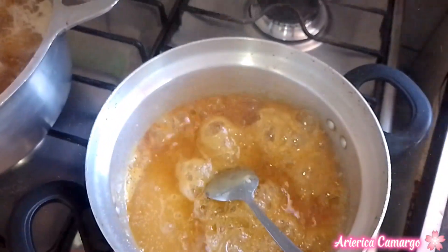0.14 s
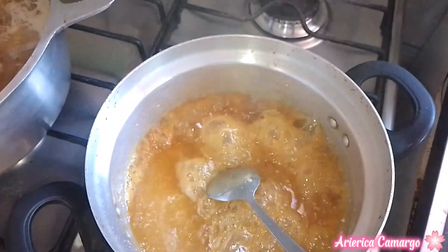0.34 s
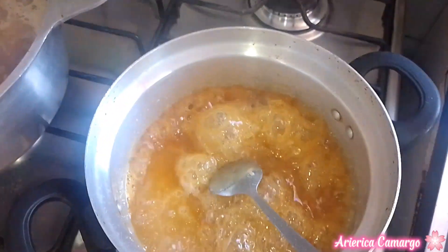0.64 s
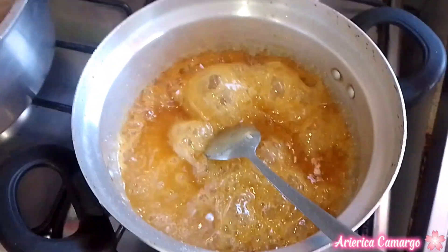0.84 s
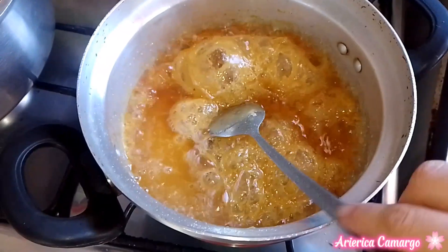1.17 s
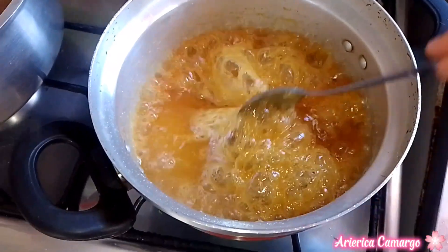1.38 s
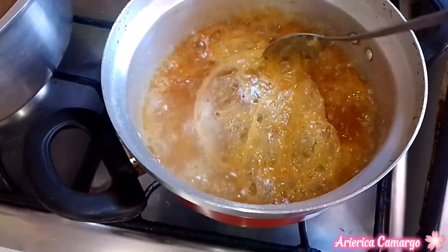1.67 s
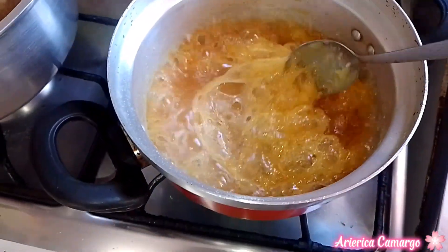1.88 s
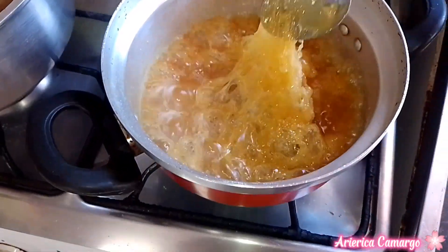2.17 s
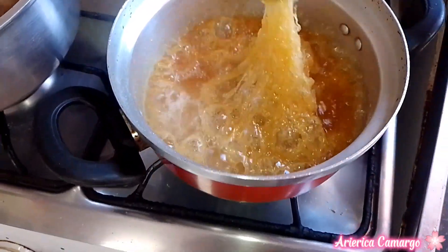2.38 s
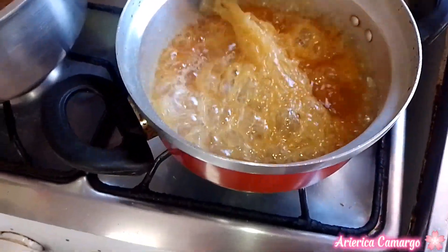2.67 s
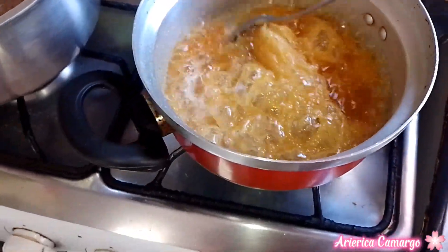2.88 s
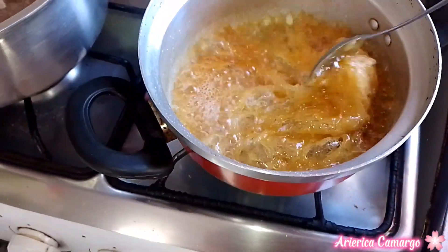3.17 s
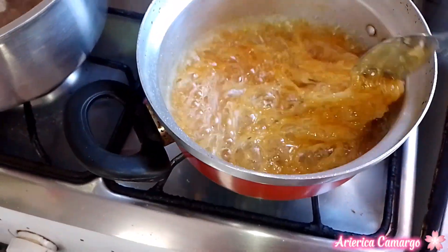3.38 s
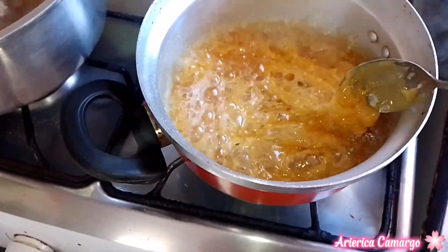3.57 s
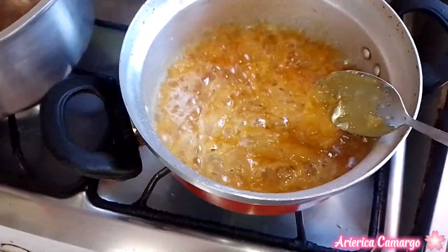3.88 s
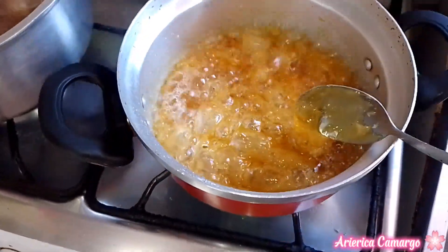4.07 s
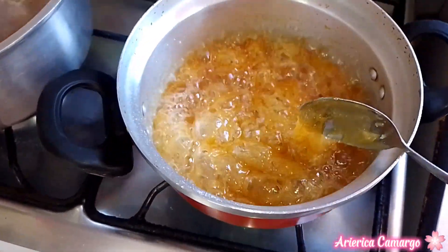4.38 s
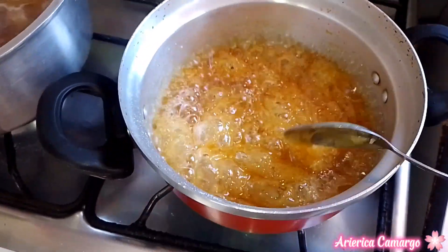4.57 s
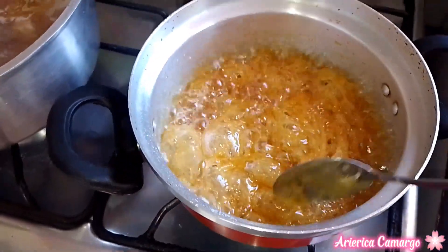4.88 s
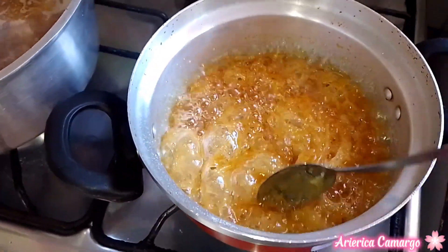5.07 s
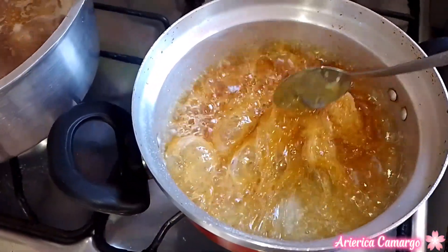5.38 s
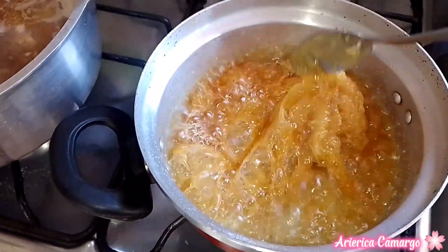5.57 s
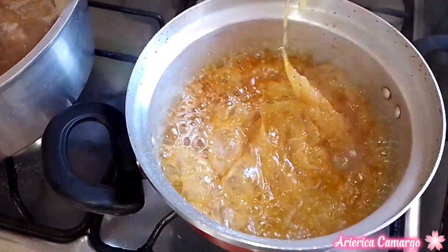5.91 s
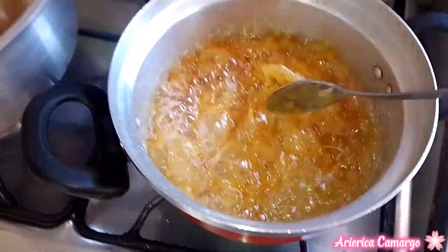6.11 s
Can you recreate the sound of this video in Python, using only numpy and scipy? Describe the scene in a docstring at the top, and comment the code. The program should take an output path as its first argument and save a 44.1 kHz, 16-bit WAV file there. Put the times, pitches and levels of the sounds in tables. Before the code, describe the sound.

Hot sugar syrup sizzles violently with steam after a brief dull scuff, then calms to gentle, thick bubbling, sputters and brittle little ticks.

```python
"""Wet caramel boils hard in an aluminium pan while a spoon folds it: flurries of random clicks, filtered
into crackle, sputter, fizz and steam, make a fierce hiss that sinks to a thin fizz with single spurts.
Brittle snaps tick on top, and decaying tones that rise in pitch make thick bubbles plop underneath.
A dull scuff of ringing tones and filtered noise comes at the start, over a faint low kitchen hum."""
import sys
import numpy as np
from scipy import signal
from scipy.fft import rfft, irfft, next_fast_len
from scipy.io import wavfile
from scipy.ndimage import uniform_filter1d

SR = 44100
rng = np.random.default_rng(int(sys.argv[2]) if len(sys.argv) > 2 else 0)


def unload_audio(sound):
    """Save the sound as a 16-bit wav file, at the path given as the first command line argument."""
    columns = np.transpose(np.atleast_2d(sound))
    # keep every value between -1 and 1, then stretch to whole-number steps
    steps = np.round(np.clip(columns, -1, 1) * 32767)
    wavfile.write(sys.argv[1], SR, steps.astype(np.int16))


N = 275388
TIME = np.arange(N) / SR
PADDED = next_fast_len(N, real=True)

# Colour of each layer before levelling: (frequency [Hz], relative density [dB per Hz])
CRACKLE_COLOUR = [(200, -67), (1900, -32), (2400, -14.5), (2750, -1), (4000, 1.5), (5200, 2.5), (6800, 1),
                  (8000, -0.5), (10500, -2.5), (12500, -20)]
SPUTTER_COLOUR = [(200, -47), (900, -5.5), (1250, -1.5), (1500, 3.5), (1750, 0), (2000, 1), (2300, 2),
                  (2800, 1), (3600, -14)]
FIZZ_COLOUR = [(200, -57), (2400, -27), (6000, -9), (7500, -3.5), (8300, 0.5), (9000, 2.5), (9700, 2),
               (10500, -1.5), (12000, -9.5)]
STEAM_COLOUR = [(200, -65), (8500, -43), (10500, 3.5), (11500, 3.5), (13000, 4.5), (14500, 1.5),
                (15700, -1.5)]
SYRUP_COLOUR = [(60, -43), (160, -24), (240, -10.5), (300, -5.5), (420, 1.5), (580, -1.5), (660, -1.5),
                (820, 1), (1050, 0), (1250, -11.5), (1600, -18), (2500, -40)]
HUM_COLOUR = [(20, 0), (55, -.5), (90, -4), (118, 4.5), (150, -2), (300, -19), (1000, -41)]
# Air modes and a hollow of the pan: (frequency [Hz], width [Hz], lift [dB])
PAN_MODES = [(302.8, 13, 8.5), (410, 43, 2), (563, 47, 3.5), (668, 21, -9.5), (820.5, 22, 5.5),
             (910, 21, 5), (1010, 18, 3), (1780, 17, 6.5)]
# How hard the surface fries: (time [s], base level of the fizz [dB])
FRYING = [(0, -24), (.35, -24.5), (.44, -28), (.78, -22), (1.03, -20.5), (1.39, -23.5), (1.48, -19),
          (1.96, -20), (2.72, -23), (2.88, -20.5), (3.65, -29.5), (4.05, -29.5), (4.16, -31), (4.33, -32),
          (4.5, -32.5), (4.62, -33), (4.75, -37), (5.1, -31), (5.7, -32), (6.06, -39), (6.24, -41.5)]
# Coarser bursts, which die away as the water is spent:
# (time [s], base crackle level [dB], base sputter level [dB])
CRACKLING = [(0, -28, -38), (.11, -30, -33), (.3, -29, -35), (1.0, -28, -39.5), (1.65, -28, -38.5),
             (2.0, -28.5, -39), (2.68, -30, -40.5), (2.8, -27, -35.5), (3.3, -29.5, -38.5),
             (3.75, -32, -42), (4.1, -35, -51), (4.75, -47, -52.5), (5.1, -45, -52.5), (5.58, -40, -47.5),
             (5.95, -48, -53), (6.24, -48.5, -52.5)]
# High hiss of the steam jets, which give out rather suddenly: (time [s], level against the fizz [dB])
JETS = [(0, -6.5), (.45, -2), (1.0, -7), (1.7, -3.5), (2.15, -5), (2.9, -5.5), (3.42, -7), (3.56, -7),
        (3.68, -13), (3.85, -15), (4.35, -16.5), (5.4, -17), (6.24, -17)]
# Middle of the fizz, which ends lower as its bubbles grow: (time [s], centre [Hz])
FIZZ_CENTRE = [(0, 9200), (4.3, 9400), (4.8, 9370), (5.5, 9050), (6.1, 9150)]
# Narrow bands lifted out of the crackle and boil, mostly late:
# (time [s], half length [s], frequency [Hz], glide [Hz per s], width [Hz], lift [dB])
LIFTED_BANDS = [(.03, .05, 2960, -4000, 256, 8), (.18, 0.039, 3070, 7000, 260, 9),
                (1.02, 0.22, 6600, 0, 200, 5.5), (2.79, 0.071, 3340, -1500, 260, 4),
                (3.9, 0.4, 2150, 0, 110, 8.5), (4.38, 0.088, 2890, 0, 130, 14.5),
                (4.38, .2, 5940, -500, 170, 7), (4.38, 0.074, 5280, 0, 130, 12), (4.4, .2, 4190, 0, 110, 6),
                (4.47, 0.22, 3830, 0, 110, 7), (4.56, .15, 5050, -200, 160, 10.5),
                (4.9, 0.18, 3120, -1200, 150, 9), (5.2, 0.18, 2920, -100, 150, 11),
                (5.22, .17, 5240, 350, 160, 9), (5.17, 0.23, 1480, -48, 100, 12.5),
                (5.6, 0.27, 1480, 150, 110, 10), (5.4, 0.24, 6710, 150, 230, 14.5),
                (5.55, 0.12, 5120, -900, 140, 10), (5.62, 0.23, 3260, 1100, 190, 12.5),
                (5.64, 0.17, 4580, -300, 170, 11), (5.75, .11, 6370, 0, 170, 16.5),
                (5.89, 0.054, 4620, 0, 130, 11), (5.92, 0.1, 2250, 0, 100, 9),
                (5.92, 0.077, 2700, 0, 100, 9), (6.093, 0.091, 3290, 0, 110, 12.5)]
# Narrow bands thinned out of the crackle and boil for a while:
# (time [s], half length [s], frequency [Hz], glide [Hz per s], width [Hz], depth [dB])
THINNED_BANDS = [(.2, 0.5, 4370, 0, 260, 5), (.42, 0.35, 1374, -90, 116, 28), (.45, 0.23, 596, 0, 70, 16),
                 (1.15, 0.39, 1340, -100, 110, 13), (1.3, 0.18, 2050, 0, 131, 33),
                 (1.25, 0.14, 2890, 0, 100, 22), (1.29, 0.14, 6300, -500, 220, 4),
                 (1.6, 0.24, 1960, 0, 85, 24), (2.1, .08, 1930, 0, 130, 12),
                 (2.54, 0.18, 2430, 150, 85, 30), (2.57, .1, 2040, 0, 80, 11), (2.55, .13, 332, 0, 70, 14),
                 (2.65, .17, 1180, -200, 110, 18), (3.55, 0.48, 1560, -300, 160, 5.5),
                 (3.77, 0.25, 2370, -200, 90, 22), (4.1, .14, 1850, 0, 300, 4.5),
                 (4.1, 0.3, 6800, 0, 170, 6), (4.42, .12, 2530, 0, 119, 8), (4.8, 0.3, 555, 0, 110, 11),
                 (6.1, 0.22, 566, 0, 70, 3)]
# Single spurts of steam: (time [s], level [dB], length [s], rise [s])
SPURTS = [(1.238, -22, 0.028, .008), (3.54, -22.5, 0.023, 0.0086), (3.61, -31, 0.013, .003),
          (3.716, -29, .016, .003), (3.887, -26, .024, .008), (3.93, -27, .012, .002),
          (4.07, -30, .033, .005), (4.194, -33, .022, .008), (4.322, -32, 0.011, .004),
          (4.366, -30, .014, .003), (4.533, -32, 0.016, 0.0092), (4.61, -34, 0.016, .008),
          (4.821, -27.5, .02, .009), (4.88, -33, .018, .004), (4.94, -32, .018, .006),
          (4.983, -27, .018, .0003), (5.044, -27, .0077, .002), (5.353, -28, .018, .008),
          (5.413, -27, .017, .009), (5.511, -28, 0.019, .008), (5.606, -24.5, 0.01, .006),
          (5.667, -29, .016, .006), (5.723, -29.5, 0.019, .008), (5.801, -30.5, 0.021, .008)]
# Sharp snaps of bursting sugar skin: (time [s], peak of the envelope [dB])
SNAPS = [(1.323, -11), (3.565, -17), (4.925, -18), (4.9805, -16), (5.064, -22), (5.151, -21), (5.203, -15),
         (5.323, -24), (5.428, -19), (5.525, -20), (5.731, -22)]
# Large bubbles welling up, mostly as the spoon folds the syrup:
# (time [s], half length [s], gain [dB], deepening [dB])
SURGES = [(0.097, 0.065, 3.5, 13), (.35, 0.22, 1, 11), (0.893, 0.14, 2, 11), (1.573, 0.28, 2.5, 11.5),
          (2.095, 0.35, 2, -2), (2.77, 0.055, 3, -3), (3.174, 0.74, 3, 13), (3.73, 0.12, -0.5, 10),
          (4.324, 0.086, 1.5, 6), (5.092, 0.16, 1, 12.5), (5.53, 0.32, 3.5, 3)]
# Single large bubbles that burst: (time [s], level before swell and decay [dB], pitch [Hz])
PLOPS = [(.699, -27, 988), (1.489, -32, 525), (2.707, -30, 548), (2.716, -39, 394), (2.742, -28, 798),
         (3.273, -31, 804), (3.45, -28, 940), (3.464, -32, 1076), (3.622, -30, 923), (3.753, -34, 813),
         (4.212, -32, 833), (4.335, -29, 910), (5.061, -32, 970), (5.613, -28, 863), (5.649, -31, 810),
         (5.84, -38, 496)]
# The scuff, in two slips and a faint settling:
# (time [s], relative level [dB], rub length [s], grit against the knock [dB])
SLIPS = [(.049, -28.5, 0.03, 0), (0.07, -23.5, 0.021, 4.5), (0.119, -46, 0.023, -3)]
# What the scuff rings with, lowest first: (frequency [Hz], width [Hz], relative level [dB])
SCUFF_RINGS = [(376, 38, 0), (1798, 27, 1), (2600, 80, 0), (3000, 62, -6)]

SETTLE_AT_S, SETTLE_S = 3.44, 0.23  # the fierce hiss gives way to a gentle fizz
FIZZ_HALF_WIDTH_HZ, FIZZ_DOUBLING_DB = 2250, 12  # the half width holds for a fizz at -30 dB
BOIL_DB, BOIL_FADE_DB_PER_S = -40.5, 0.0656
EDGE_HZ = 15780


def sizzle():
    """Water flashes to steam in dense tiny bursts that come in flurries."""
    fizz_db = curve(FRYING, TIME)
    crackle_db = curve(CRACKLING, TIME)
    sputter_db = curve(CRACKLING, TIME, column=2)
    steam_db = fizz_db + curve(JETS, TIME)
    flurry = wander(rate_hz=25) + 0.38 * wander(rate_hz=17)
    calm = np.clip((-21.5 - fizz_db) / 12, 0, 1)  # fewer bursts: each flurry stands out more

    crackle = in_pan(pops(per_s=11000, spread_db=1.5), CRACKLE_COLOUR)
    crackle = crackle * gain_of(crackle_db + 0.37 * flurry + 0.98)
    sputter = in_pan(pops(per_s=4000, spread_db=1.0), SPUTTER_COLOUR)
    sputter = sputter * gain_of(sputter_db + 0.24 * flurry + 2.0)
    coarse = sweep(crackle + sputter + ticks(), crackle_colour)

    fizz = sweep(in_pan(pops(per_s=16000, spread_db=2.5), FIZZ_COLOUR), fizz_band)
    fizz = fizz * gain_of(fizz_db + (0.38 + 0.76 * calm) * flurry - 0.2)
    steam = sweep(in_pan(pops(per_s=16000, spread_db=2.4), STEAM_COLOUR), steam_tilt)
    steam = steam * gain_of(steam_db + flurry)
    return coarse + fizz + steam


def ticks(level_db=-12, cycles=4.8, count=12):
    """Separate tiny bubbles stand out of the crackle, each ringing for a moment at its own pitch."""
    t, out = np.arange(SR // 50) / SR, np.zeros(N)
    for hz in np.geomspace(2800, 7000, count):
        ring = evened(np.exp(-hz * t / cycles) * np.sin(2 * np.pi * hz * t))
        out += signal.oaconvolve(pops(per_s=24, spread_db=2.5), ring)[:N]
    out = filtered(out, 6, 2500, "high")
    return evened(out) * gain_of(curve(CRACKLING, TIME) + level_db)


def crackle_colour(hz, t, patchy_db=1.5):
    """The coarse bursts take on a shifting colour and come in small clusters, in dB."""
    return shifting_colour(hz, t) + patchy_db * clusters(hz, t, size=9)


def fizz_band(hz, t, edge_hz=120, skirt_db=-19, widest_hz=3300):
    """A gentle fizz has bubbles of nearly one size; a fierce one spreads wider, in dB."""
    half_width = FIZZ_HALF_WIDTH_HZ * 2 ** ((curve(FRYING, t) + 30) / FIZZ_DOUBLING_DB)
    half_width = np.minimum(half_width, widest_hz)
    within_hz = half_width - abs(hz - curve(FIZZ_CENTRE, t))
    inside = (1 + np.tanh(within_hz / edge_hz / 2 + .5)) / 2
    return skirt_db * (1 - inside) + 2.4 * clusters(hz, t)


def steam_tilt(hz, t, slope_db_per_khz=2.3, shelf_db=1.0, shelf_hz=11400, patchy_db=2.6):
    """As the jets weaken, the hiss loses its highest part first, in dB."""
    above_khz = np.maximum(hz - shelf_hz, 0) / 1000
    loss_db = shelf_db * np.tanh(2 * above_khz) + slope_db_per_khz * above_khz
    return patchy_db * clusters(hz, t) - settled(t) * loss_db


def spurts():
    """A pocket of steam tears open and fizzes for a moment."""
    strength, t = np.zeros(N), np.arange(SR // 10) / SR
    for s, db, length, rise in SPURTS:
        opening = np.minimum(t / rise, 1)
        add(strength, s, gain_of(db) * opening * bell(t ** 2, 0, length ** 2))
    bursts = pops(per_s=12000, spread_db=2.4)
    return strength * sweep(in_pan(bursts, FIZZ_COLOUR), fizz_band)


def snaps(ring_hz=9200, swell_s=0.00015):
    """A brittle film breaks with a very short, high tick."""
    out, t = np.zeros(N), np.arange(SR // 200) / SR
    envelope = t / swell_s * np.exp(1 - t / swell_s)
    for s, db in SNAPS:
        add(out, s, gain_of(db) * envelope * np.sin(2 * np.pi * ring_hz * t))
    return out


def boil(per_s=90, cycles=3.82, rise=0.12, count=30):
    """Bubbles in thick syrup: each rings for a few cycles and rises a little in pitch."""
    t, bubbles = np.arange(2500) / SR, np.zeros(N)
    for hz in np.geomspace(270, 1400, count):
        age = hz * t / cycles  # 1 when the ring has decayed by a factor e
        pitch = hz * (1 + rise * np.minimum(age, 2))
        ring = np.exp(-age) * np.sin(2 * np.pi * np.cumsum(pitch) / SR)
        bubbles += hz * signal.oaconvolve(pops(per_s, spread_db=1.5), ring)[:N]
    fine_clicks = gain_of(4.5) * pops(per_s=1200, spread_db=2.0)
    syrup = drift(in_pan(evened(bubbles) + fine_clicks, SYRUP_COLOUR))
    surge_db, _ = surge(TIME)
    level_db = BOIL_DB - BOIL_FADE_DB_PER_S * TIME + surge_db
    return sweep(syrup, bubble_size, size=2048) * gain_of(level_db)


def bubble_size(hz, t, corner_hz=340, rest_db=-11, colour_share=0.77):
    """When the bubbles grow large the boil reaches deeper, in dB."""
    _, deep_db = surge(t)
    low_end_db = (rest_db + deep_db) / (1 + (hz / corner_hz) ** 8)
    return low_end_db + colour_share * shifting_colour(hz, t)


def surge(t):
    """Extra level and extra depth of the boil as large bubbles well up, both in dB."""
    return sum(np.outer([db, deep_db], bell(t, s, length)) for s, length, db, deep_db in SURGES)


def drift(x, share=0.00805):
    """Steam and the heaving surface pull the pan's resonances slightly up and down: a wavering speed."""
    shift_s = share * np.cumsum(wander(rate_hz=2.97)) / SR
    return np.interp(TIME + shift_s, TIME, x, period=N / SR)


def plops(cycles=9, rise=0.052, swell_s=0.0032):
    """A large bubble opens and rings briefly, rising a little in pitch."""
    out, t = np.zeros(N), np.arange(SR // 8) / SR
    for s, db, hz in PLOPS:
        age = hz * t / cycles
        pitch = hz * (1 + rise * (np.minimum(age, 2) - .5))
        ring = np.sin(2 * np.pi * np.cumsum(pitch) / SR)
        add(out, s, gain_of(db) * np.minimum(t / swell_s, 1) * np.exp(-age) * ring)
    return filtered(out, 6, 260, "high")


def scuff():
    """Each slip knocks the lowest mode and rubs the upper ones, with a broad rasp."""
    out, t = np.zeros(N), np.arange(SR // 10) / SR
    rings = []
    for hz, width, db in SCUFF_RINGS:
        ring = np.exp(-np.pi * width * t) * np.sin(2 * np.pi * hz * t)
        rings.append(gain_of(db) * evened(ring))
    knock = evened(rings[0] * (1 - bell(t, 0, 0.0057)))  # softened onset
    for s, db, length, grit_db in SLIPS:
        rub = rng.standard_normal(len(t)) * bell(t, length / 4, length / 2)
        rubbed_rings = signal.fftconvolve(rub, sum(rings[1:]))[:len(t)]
        rasp = filtered(rub, 2, [400, 3200], "band")
        grit = evened(filtered(rubbed_rings, 2, 600, "high")) + gain_of(-9) * evened(rasp)
        add(out, s, gain_of(db - 13.0) * (knock + gain_of(grit_db) * evened(grit)))
    # a faint low rumble under the first knock
    push = evened(filtered(rng.standard_normal(len(t)), 2, [55, 150], "band"))
    add(out, SLIPS[0][0], gain_of(-49.0) * push * (1 - bell(t, 0, .005)) * np.exp(-t / 0.039))
    return out


def kitchen():
    """A faint, uneven low hum, coloured by the pan, that swells with the deep bubbling."""
    _, deep_db = surge(TIME)
    uneven_db = 8 * np.tanh(1.5 * wander(rate_hz=7))
    hum = in_pan(rng.standard_normal(N), HUM_COLOUR)
    return hum * gain_of(-87 + 0.47 * deep_db + uneven_db)


def shifting_colour(hz, t, fierce_db=1.5, gentle_db=2.5, broad_db=0.6, broad_from_hz=2500):
    """Narrow bands swell or thin out, and random bands wander, more so once settled, in dB."""
    chance_db = (fierce_db + (gentle_db - fierce_db) * settled(t)) * ripple(hz, t)
    treble = np.minimum(hz / broad_from_hz, 1) ** 2  # broader bands act mostly up here
    chance_db = chance_db + broad_db * treble * ripple(hz, t, size=10)
    lifted_db = drifting_bands(LIFTED_BANDS, hz, t, wobble=.009, flutter=.22)
    thinned_db = drifting_bands(THINNED_BANDS, hz, t, wobble=.005, flutter=.2)
    return lifted_db - thinned_db + chance_db


def drifting_bands(table, hz, t, wobble, flutter, rate_hz=13):
    """Narrow bands come, glide and fade, unsteady in pitch and strength, in dB."""
    knots, total = np.arange(0, t[-1] + 1, 1 / rate_hz / 2), np.zeros((len(hz), len(t)))
    chance = rng.standard_normal((len(table), 2, len(knots)))
    for (s, length, f, glide, width, db), draws in zip(table, chance):
        near = abs(t - s) < 2 * length
        age = t[near] - s
        pitch, strength = (np.interp(t[near], knots, row) for row in draws)
        centre = f * (1 + wobble * pitch) + glide * age
        swell_db = db * (1 + flutter * strength) * bell(age ** 2, 0, length ** 2)
        total[:, near] += swell_db * bell(hz, centre, width)
    return total


def ripple(hz, t, size=4):
    """Random bands, smoothed over size bins, swell and fade over a few tenths of a second, rms 1."""
    field = rng.standard_normal((len(hz), len(t)))
    for _ in range(2):
        field = uniform_filter1d(uniform_filter1d(field, size=size, axis=0), size=18, axis=1)
    return evened(field - uniform_filter1d(field, size=5 * size, axis=0))


def clusters(hz, t, size=6):
    """Bubbles alike in size burst together: brief patches, size bins wide, rms 1."""
    field = rng.standard_normal((len(hz), len(t)))
    return evened(uniform_filter1d(uniform_filter1d(field, size=size, axis=0), size=4, axis=1))


def settled(t):
    """Near 0 while the steam jets fiercely, near 1 once the boil is gentle."""
    return (1 + np.tanh((t - SETTLE_AT_S) / SETTLE_S)) / 2


def pops(per_s, spread_db):
    """Random clicks of either sign, most small and a few large, at rms 1."""
    place, size, sign = rng.random((round(per_s * N / SR), 3)).T
    size_db = spread_db * np.minimum(-np.log(1 - size), 4)
    clicks = gain_of(size_db) * np.sign(sign - .5)
    return evened(np.bincount((place * N).astype(int), clicks, N))


def wander(rate_hz):
    """Smooth chance of rms 1, up to about this rate."""
    hz = np.fft.rfftfreq(PADDED, 1 / SR)
    shape = hz / (hz + 2) / (1 + (hz / rate_hz) ** 2)
    return evened(irfft(rfft(rng.standard_normal(PADDED)) * shape, PADDED)[:N])


def in_pan(x, spectrum):
    """Gives a sound its own colour and the pan's air modes, at rms 1."""
    hz = np.fft.rfftfreq(PADDED, 1 / SR)
    modes_db = sum(db / (1 + (2 * (hz - f) / width) ** 2) for f, width, db in PAN_MODES)
    return evened(irfft(rfft(x, PADDED) * gain_of(read(spectrum, hz) + modes_db), PADDED)[:N])


def sweep(x, field_db, size=1024):
    """Filters by a gain that moves over frequency and time, evened so average power holds."""
    hz, t, z = signal.stft(x, SR, nperseg=size)
    gain = gain_of(field_db(hz[:, None], t))
    power = np.mean(abs(z) ** 2, 1, keepdims=True)
    gain = gain / np.sqrt((power * gain ** 2).sum(0) / power.sum())
    return signal.istft(z * gain, SR, nperseg=size)[1][:N]


def filtered(x, order, hz, kind):
    """A Butterworth filter."""
    return signal.sosfilt(signal.butter(order, hz, kind, fs=SR, output="sos"), x)


def curve(table, t, column=1):
    """One column of a control table at times t."""
    columns = np.transpose(table)
    return np.interp(t, columns[0], columns[column])


def read(points, hz):
    """A spectrum in dB, joined on a log-frequency axis."""
    f, db = np.transpose(points)
    return np.interp(np.log(hz + 1), np.log(f), db)


def bell(x, centre, width):
    """A smooth hump of height 1."""
    return np.exp(-np.minimum(((x - centre) / width) ** 2, 20))


def gain_of(db):
    """Decibels to amplitude."""
    return 10 ** (np.asarray(db) / 20)


def evened(x):
    """Scales to rms 1."""
    return x / np.sqrt(np.mean(x ** 2) + 1e-20)


def add(mix, s, sound):
    """Mixes a sound in at time s."""
    part = mix[max(round(s * SR), 0):][:len(sound)]
    part += sound[:len(part)]


def scene():
    """All layers sum to one signal, alike in both channels."""
    mono = sizzle() + spurts() + snaps() + boil() + plops() + scuff() + kitchen()
    return np.array([mono, mono])


def record(dry):
    """A steep low-pass limits the band."""
    low_pass = signal.firwin(701, EDGE_HZ, window=("kaiser", 9), fs=SR)
    return signal.oaconvolve(dry, low_pass[None], "same", axes=1)


dry = scene()
out = record(dry)
unload_audio(out)
```